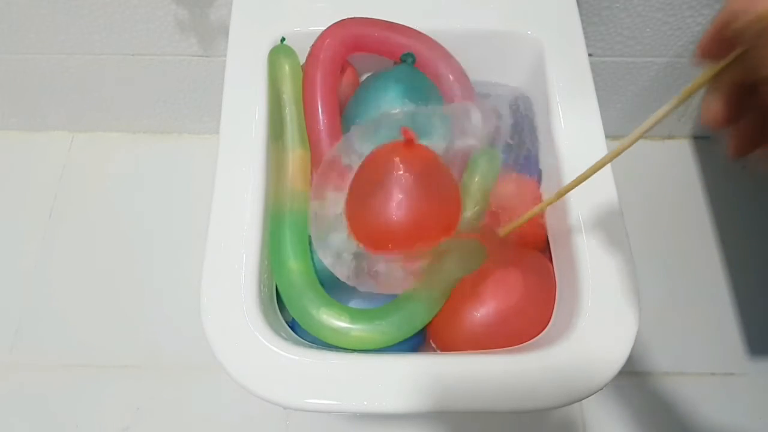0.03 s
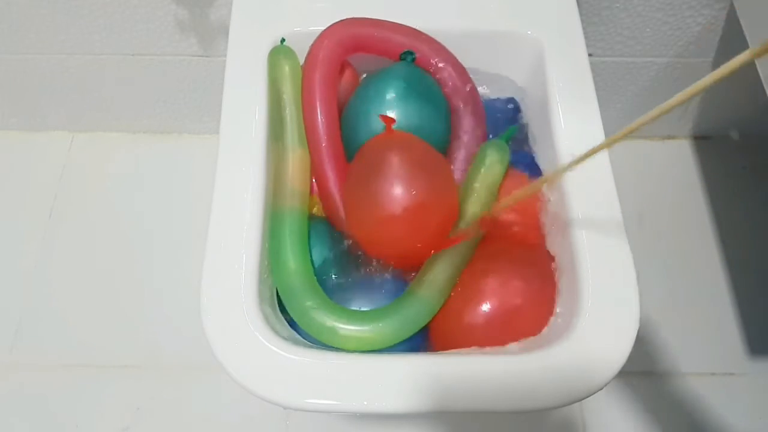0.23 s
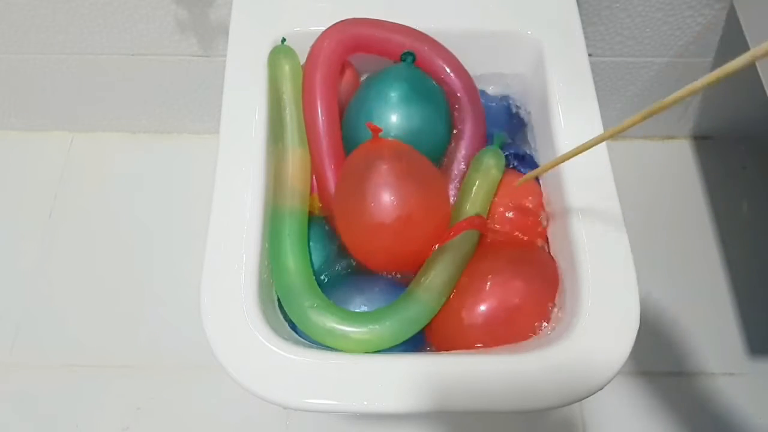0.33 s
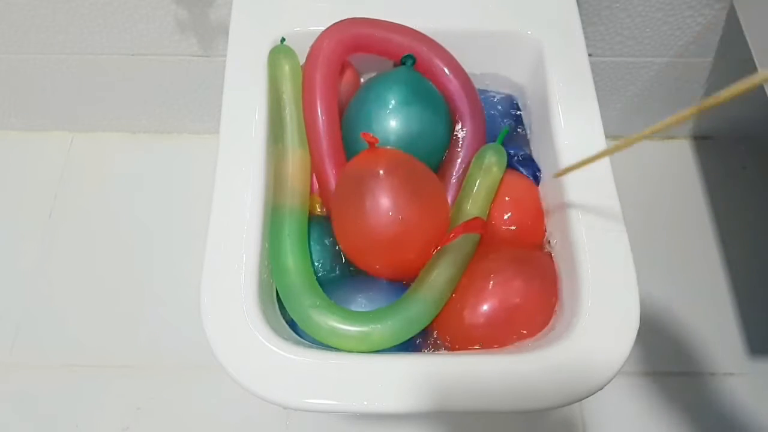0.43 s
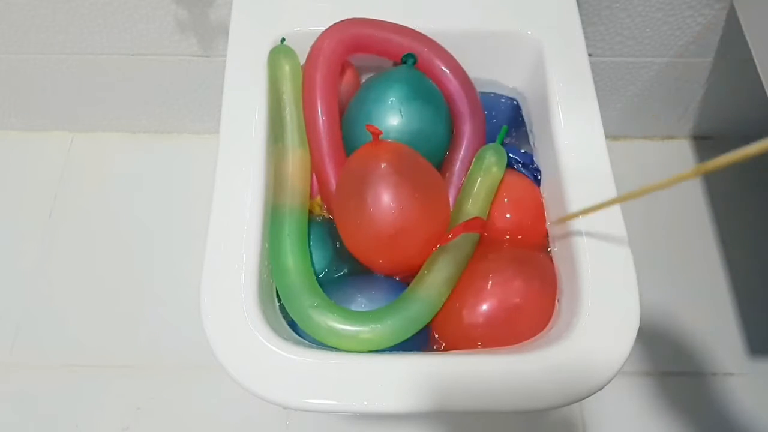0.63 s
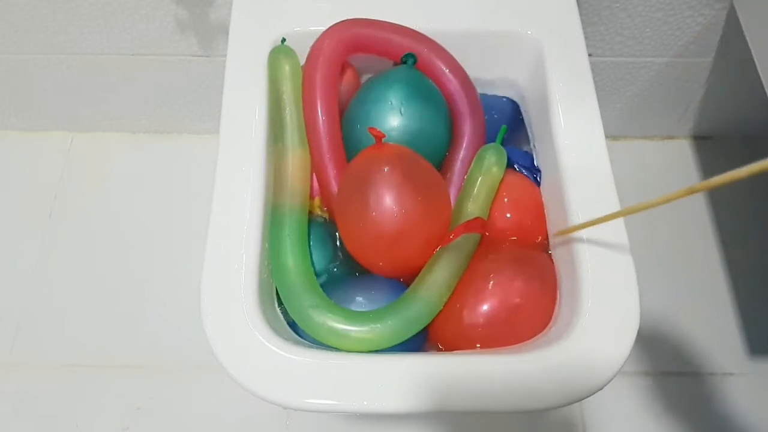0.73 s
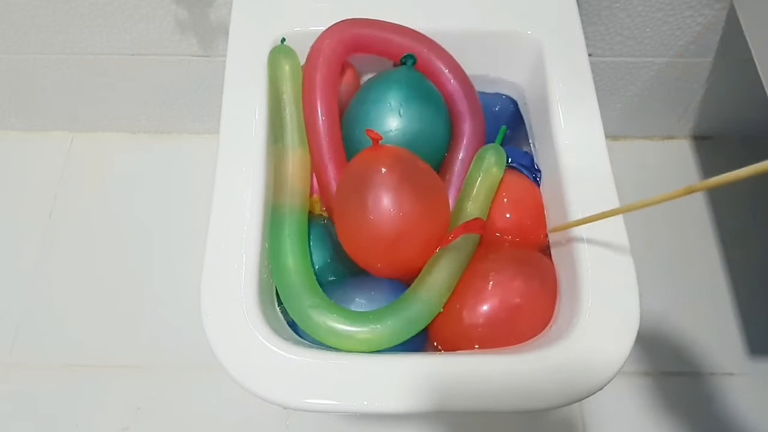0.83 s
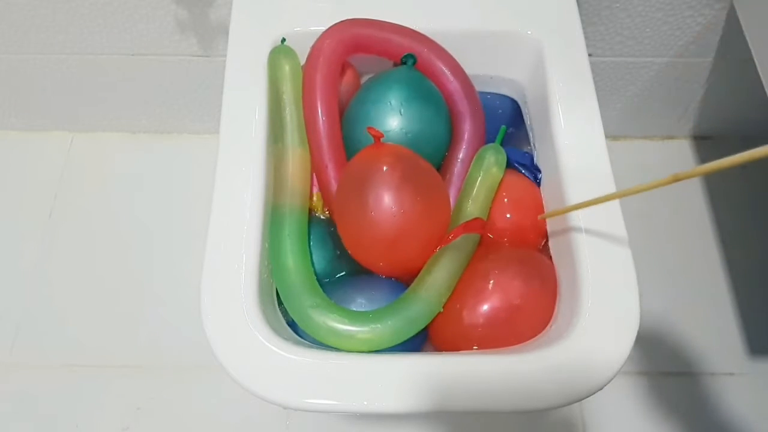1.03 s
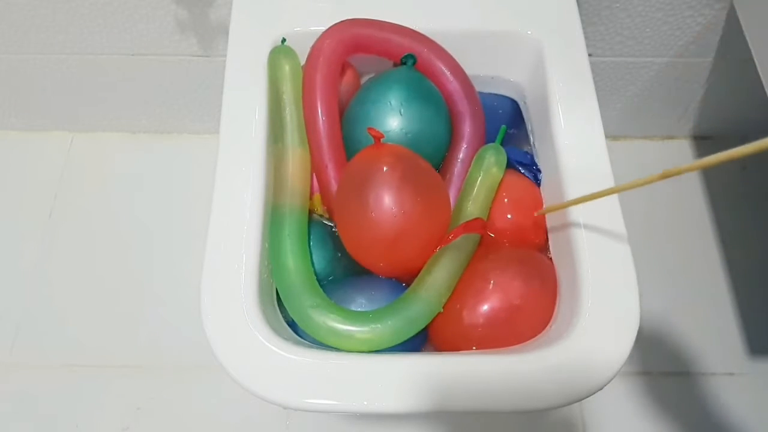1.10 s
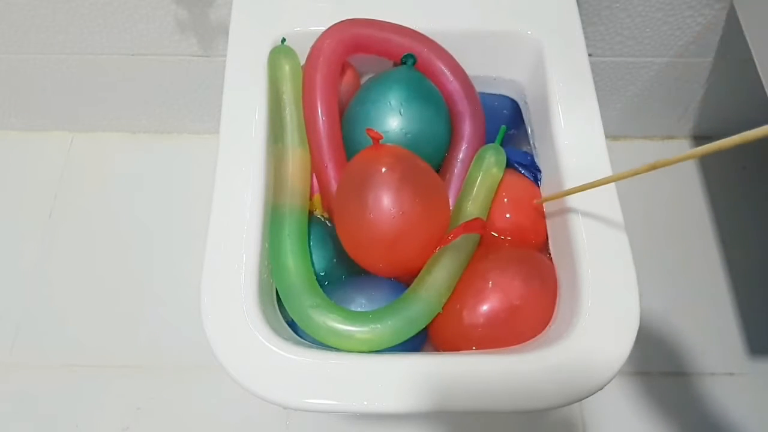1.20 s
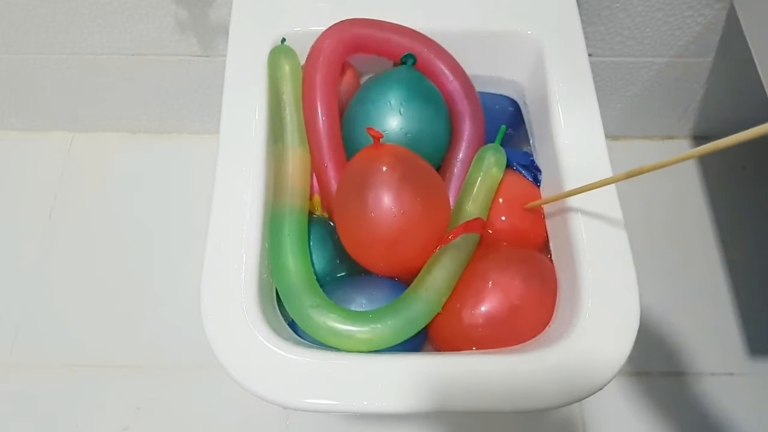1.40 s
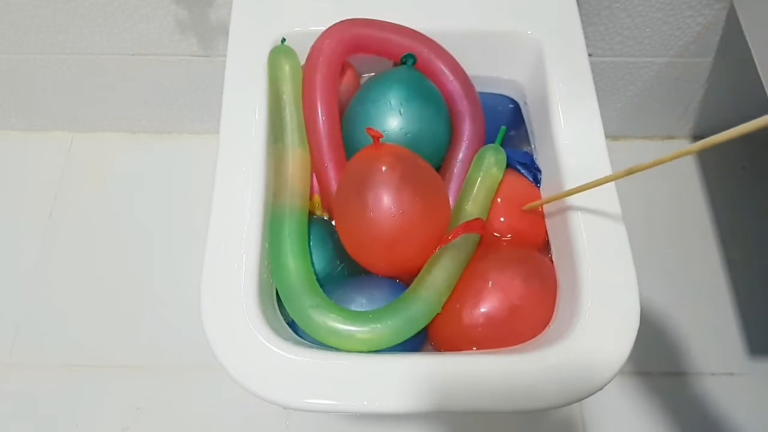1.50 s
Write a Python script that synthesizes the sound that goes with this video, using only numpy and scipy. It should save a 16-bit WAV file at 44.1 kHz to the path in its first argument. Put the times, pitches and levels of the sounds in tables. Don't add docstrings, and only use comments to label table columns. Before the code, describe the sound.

A balloon bursts: after 0.2 seconds of quiet room tone, a tiny rubber tear leads instantly into a very loud, sharp crack. Dense echoes from basin and tiled walls ring brightly, fading over about half a second. Faint water trickles and small drips follow from 0.45 to 1.0. From 1.2 to 1.55 a soft low dragging rumble with slight ticks, then quiet hiss. Close stereo phone microphone.

```python
import sys
import numpy as np
from scipy import signal
from scipy.io import wavfile

SR = 44100
rng = np.random.default_rng(int(sys.argv[2]) if len(sys.argv) > 2 else 0)


def store_pcm(level_fs):
    pcm = np.round(np.clip(level_fs, -1, 1) * 32767).astype(np.int16)
    wavfile.write(sys.argv[1], SR, np.atleast_2d(pcm).T)


def makeup_ratio(level_db):
    decades = np.asarray(level_db, float) / 20
    return 10 ** decades


N = 68355
T = np.arange(N) / SR
RUN_IN = 8000
BAND_EDGES_HZ = 22 * 2 ** np.arange(0, 9.5, .35)

# (time [s], peak level [dB], pitch [Hz], left-right [dB])
SNAPS = [
    (.1997, -13, 2400, -1.5),
    (.2008, -12, 2400, -5.0),
    (.20214, -.1, 2750, -1.5),
    (.2033, -8.5, 2100, 0),
    (.2046, -8, 1750, -1.5),
    (.2086, -12, 2100, 3.0),
    (.2091, -10, 1900, 0),
]
# (frequency [Hz], density [dB per Hz])
BANG_COLOUR = [(150, -23), (260, -22), (360, -6), (800, -0.5), (1250, -2), (2300, 3), (6500, -7),
               (15000, -8.5)]
# (time [s], peak level [dB], pitch [Hz], left-right [dB])
ECHOES = [(0.2086, -13, 1894, -1), (0.211, -13, 3100, -15), (0.2135, -15, 2411, -14),
          (0.2153, -20, 861, -5), (0.22, -14, 1033, 2), (0.2195, -13, 3273, 3), (0.225, -15, 3014, -1),
          (0.2289, -18, 1550, -7), (0.2374, -20, 3100, 1), (0.237, -12, 2067, 9), (0.2413, -13, 1894, -6),
          (0.2471, -17, 2497, 5), (0.249, -12, 3703, -3), (0.253, -15, 2583, 3), (0.2578, -21.5, 2153, -21),
          (0.2612, -26, 2756, 5), (0.2672, -23, 2497, -1), (0.2783, -22, 3186, -15), (0.279, -19, 775, -5),
          (0.2833, -22, 1033, -12), (0.2848, -23, 3014, 4), (0.289, -22, 1119, -14), (0.291, -22, 2239, 3),
          (0.2977, -18, 2497, 14), (0.3043, -20, 2670, 1), (0.308, -22, 2411, -11), (0.3145, -20, 1119, 2),
          (0.3153, -18, 3014, -8), (0.3213, -18, 1119, -9), (0.328, -24, 1291, 13), (0.3302, -34, 2153, -4),
          (0.3412, -24, 1291, -1)]
# (frequency [Hz], T60 [s])
TILES_T60 = [(100, 1.0), (300, 0.92), (700, 0.79), (2000, 0.74), (4000, 0.62), (8000, 0.5), (12500, .42),
             (14300, 0.36)]
# (frequency [Hz], delay [s])
FIRST_WALL = [(600, 0.00401), (2500, 0.0058), (7000, .013), (14000, .012)]
# (frequency [Hz], level [dB], T60 [s])
ROOM_MODES = [(330.3, -7, 0.82), (390.6, -6.5, .8), (521.6, -1, .8), (775, -7.5, .5), (810, -2.5, .5),
              (968, -1.5, 0.58), (1128, -1, 0.68), (1572, -1.5, 0.37), (1660, -9, .5), (1964, 2, 1),
              (2440, -2, 0.7), (2720, -3, 0.67), (3300, 3.5, 0.55)]
# (middle time [s], peak level [dB], pitch [Hz], length
# [s])
JOLTS = [(0.21, -42.5, 181, 0.028), (0.2, -51, 38, .03), (0.22, -24.5, 797, 0.017), (0.29, -33, 960, 0.087),
         (.3, -37.5, 1100, 0.04), (0.25, -42, 385, 0.06), (0.3, -48.5, 172.5, 0.052),
         (1.211, -45, 158, 0.066), (1.193, -57.5, 650, 0.07), (1.232, -48.5, 250, 0.021),
         (.34, -65, 33, 0.062), (.262, -30.5, 2390, .06), (.315, -39, 400, .05), (.24, -30.5, 960, 0.06),
         (.305, -30, 3370, 0.037), (.385, -65.5, 95, 0.088), (.445, -59, 87, 0.026), (1.28, -49, 373, .02),
         (1.276, -55.5, 640, 0.028), (1.302, -48, 344, 0.016), (1.317, -54, 580, 0.021),
         (1.355, -50, 310, .02), (1.6, -41.5, 265, 0.012), (1.3966, -53.5, 650, 0.015),
         (1.414, -47, 390, .018), (1.471, -53.5, 340, 0.024), (1.492, -53, 317, 0.019),
         (1.511, -51.5, 500, 0.017), (1.269, -44.5, 145, 0.04), (1.281, -50, 410, 0.076),
         (1.321, -44, 162, 0.035), (1.9, -49, 55, 0.055), (1.355, -55.5, 391.7, 0.05),
         (1.395, -49, 173, 0.062), (1.403, -48.5, 390, 0.027), (1.418, -52, 480, 0.046),
         (1.464, -50.5, 165.2, 0.038), (1.511, -51.5, 173, 0.042), (1.54, -59.5, 55, 0.048)]
# (time [s], peak level [dB], pitch [Hz], ring [cycles])
DROPS = [(0.6634, -45.5, 920, 7.8), (0.753, -45.5, 2600, 8.0), (0.7824, -51.5, 5640, 5.6),
         (.7826, -52, 11000, 3.0), (.782, -51, 1821, 6.4), (.7815, -49.5, 3020, 6.7),
         (.9115, -48, 3550, 22), (0.9126, -47, 1429, 5.2), (0.9128, -44.5, 2400, 10.9),
         (.9125, -52, 6500, 5.0), (.9155, -49, 2165, 7.46), (.9245, -53, 2220, 8.6), (.928, -53, 3610, 33),
         (.945, -59, 3800, 27), (.9378, -57, 2870, 12), (.9595, -55, 2200, 9.5), (.9965, -56, 2200, 9.4),
         (1.0417, -62, 6990, 25), (1.321, -58, 2337, 12.6), (.9385, -54.5, 2010, 5),
         (0.9664, -54, 2980, 3.5), (1.226, -60, 11030, 6.4), (1.4374, -47, 14320, 38),
         (1.4375, -53.5, 12160, 30.0), (1.4378, -57, 4560, 8.2), (1.4555, -50, 1520, 31),
         (1.4757, -51.5, 1590, 11.3), (1.4762, -55, 2200, 8.7)]
# (time [s], level [dB])
TRICKLE = [(.2, -76), (.45, -52.5), (.65, -59), (.8, -60), (.9, -62.5), (.93, -56.5), (1.02, -66.5),
           (1.2, -71.5), (1.55, -67.5)]
# (frequency [Hz], density [dB per Hz])
WATER_COLOUR = [(300, -21), (600, -10), (1000, -2.5), (2600, -3.5), (4500, -13.5), (8000, -16),
                (13000, -22.5), (15000, -23)]
# (time [s], level [dB])
DRAG = [(1.175, -68), (1.205, -49), (1.246, -47.5), (1.268, -46), (1.374, -46), (1.402, -46),
        (1.434, -48.5), (1.502, -49.5), (1.55, -57.5)]
# (frequency [Hz], density [dB per Hz])
DRAG_COLOUR = [(25, -3), (55, -5.5), (90, -7.5), (160, -5.5), (300, -6), (600, -10.5), (900, -18),
               (1500, -21.5), (4000, -44)]
# (frequency [Hz], density [dB per Hz])
AIR_COLOUR = [(30, -17), (50, -2.5), (95, -15.5), (160, -2.5), (350, -1.5), (650, -5.5), (1100, -12),
              (4000, -23)]
# (frequency [Hz], likeness [-1 to 1])
LIKENESS = [(30, 1.3), (130, 0.6), (290, 1.17), (640, 0.43), (1400, 0.01), (15000, 0)]
# (frequency [Hz], left-right [dB])
SIDES = [(60, -1), (240, -5), (950, -6.5), (3770, -4.5), (15000, 3)]
# (frequency [Hz], left-right [dB])
TILES_SIDES = [(60, -14), (240, -8), (950, -2), (3770, -3), (15000, 2.2)]

TEAR_START_S, TEAR_RISE_S, TEAR_END_S, TEAR_DB = .1977, 0.0016, .2048, -21
SNAP_LOW_CUT_HZ, SNAP_T60_S = 259, .0012
BURST_S = SNAPS[0][0]
AFTER_BANG_S = SNAPS[1][0]
ECHO_DB, ECHO_S = -5.5, 0.00089
TILES_DB, TILES_BUILD_S, LOW_DELAY_CYCLES = -22, 0.004, 3.0
TILES_PATCHY_DB, TILES_TOP_HZ = 1.5, 14100
BEFORE_WALL = 0.47
TAIL_LIFT_DB, LIFT_FADES_S, LIFT_FADE_S = 2.5, .14, 0.016
MODES_DB, MODE_BUILD_CYCLES, LONGEST_MODE_S = -31.5, 35, .55
DROP_ROOM_DB, DROP_ROOM_CUT_HZ, DROP_ROOM_EXTRA_DB_PER_S = -39, 8600, 65.5
NEAR_FROM_S = 1.1
FIZZ_PER_S = 5100
AIR_DB, AIR_DUCK_DB, AIR_BACK_S = -61.5, -10, 0.33
HISS_DB, HISS_TILT, HISS_RISE_DB, HISS_LOW_HZ, HISS_TOP_HZ = -78, 0.22, 5, 2500, 14600
CUTOFF_HZ = 15600
MIC_DIP_HZ, MIC_DIP_Q, MIC_DIP_SHARE = 9110, 10, .45


def rms_one(x):
    return x / np.sqrt(np.mean(x ** 2) + 1e-20)


def in_time(rows):
    return np.interp(T, *np.transpose(rows))


def at_hz(points, hz):
    table_hz, values = np.transpose(points)
    return np.interp(np.log(hz), np.log(table_hz), values)


def filtered(sos, x):
    return signal.sosfilt(sos, x)


def left_right(db):
    return makeup_ratio(np.array([[db / 2], [-db / 2]]))


def drift(rate_hz):
    r = np.exp(-2 * np.pi * rate_hz * 40 / SR)
    slow = signal.lfilter([1], [1, -2 * r, r * r], rng.standard_normal(N // 40 + 2002))[2000:]
    return np.interp(np.arange(N) / 40, np.arange(len(slow)), rms_one(slow))


def ring(clicks, hz, t60):
    r, w = makeup_ratio(-60 / (t60 * SR)), 2 * np.pi * hz / SR
    return signal.lfilter([0, np.sin(w)], [1, -2 * r * np.cos(w), r * r], clicks + 1e-18)


def noise():
    return rng.standard_normal((2, 2, N + RUN_IN))


def bands(white, spectrum, sides, shape):
    out = 0
    for k, (low, high) in enumerate(zip(BAND_EDGES_HZ, BAND_EDGES_HZ[1:])):
        band = signal.butter(2, [low, high], "band", fs=SR, output="sos")
        mid, side = filtered(band, white[k % 2])[:, RUN_IN:]
        hz = np.sqrt(low * high)
        alike = np.clip(at_hz(LIKENESS, hz), -1, 1)
        pair = np.sqrt(1 + alike) * mid + np.sqrt(1 - alike) * side * [[1], [-1]]
        out = out + makeup_ratio(at_hz(spectrum, hz)) * shape(hz) * pair * left_right(at_hz(sides, hz))
    return out


def burst():
    rise = np.clip((T - TEAR_START_S) / TEAR_RISE_S, 0, 1) ** 3
    end = np.exp(-np.clip(T - TEAR_END_S, 0, 1) / 0.00097)
    out = makeup_ratio(TEAR_DB) * rise * end * rms_one(bands(noise(), BANG_COLOUR, TILES_SIDES, lambda hz: 1))
    for s, db, hz, pan_db in SNAPS:
        cycles = (T - s) * hz
        onset = (cycles / 0.2) ** 2
        decay = cycles / (hz * SNAP_T60_S) * np.log(1000)
        fade = np.exp(-np.where(cycles < 0, onset, decay))
        out -= makeup_ratio(db) * left_right(pan_db) * np.cos(2 * np.pi * cycles) * fade
    return filtered(signal.butter(5, SNAP_LOW_CUT_HZ, "high", fs=SR, output="sos"), out)


def echoes():
    out = np.zeros((2, N))
    for s, db, hz, pan_db in ECHOES[1:]:
        pan_db = np.clip(pan_db, -12, 12)
        level = makeup_ratio(db + ECHO_DB - abs(pan_db) / 4) * left_right(pan_db)
        tone = np.sin(2 * np.pi * (hz * T + rng.random((2, 1))))
        out += level * tone * np.exp(-((T - s) / ECHO_S) ** 2)
    return out


def tiles():
    def dying(hz):
        arrived = (1 + np.tanh((T - at_hz(FIRST_WALL, hz)) / 0.00102)) / 2
        wall = BEFORE_WALL + (1 - BEFORE_WALL) * arrived
        build = 1 - np.exp(-T / (TILES_BUILD_S + LOW_DELAY_CYCLES / hz))
        return wall * build * makeup_ratio(TILES_PATCHY_DB * drift(45) - 60 * T / at_hz(TILES_T60, hz))

    tail = bands(noise(), [(80, -62)] + BANG_COLOUR, TILES_SIDES, dying)
    tail = filtered(signal.ellip(6, 1, 30, TILES_TOP_HZ, fs=SR, output="sos"), tail)
    return tail / np.sqrt(np.mean(tail[:, :SR // 20] ** 2))


def bang_tail(room):
    lift = TAIL_LIFT_DB / (1 + np.exp((T - LIFT_FADES_S) / LIFT_FADE_S))
    start = int(BURST_S * SR)
    return np.pad(makeup_ratio(TILES_DB + lift) * room, ((0, 0), (start, 0)))[:, :N]


def modes():
    since = np.clip(T - SNAPS[2][0], 0, 9)
    out = np.zeros((2, N))
    for hz, db, t60 in ROOM_MODES:
        decay = makeup_ratio(MODES_DB + db - 60 * since / min(t60, LONGEST_MODE_S + 100 / hz))
        build = 1 - np.exp(-since * hz / MODE_BUILD_CYCLES)
        phase = rng.random((2, 1)) * np.clip(hz / 1500, 0, 1)
        out += decay * build * np.sin(2 * np.pi * (hz * since + phase))
    return out


def jolts():
    dry = np.zeros(N)
    for s, db, hz, length in JOLTS:
        swell = np.exp(-(3.5 * (T - s) / length) ** 2)
        dry += makeup_ratio(db) * np.sin(2 * np.pi * (hz * T + rng.random())) * swell
    return dry * left_right(-4.4)


def drops(room):
    dry = np.zeros(N)
    for s, db, hz, cycles in DROPS:
        start, size = int(s * SR), int(SR * (0.00045 + 1.58 / hz))
        rough = 1 + .5 * rng.standard_normal(size)
        puff = np.zeros(N)
        puff[start:start + size] = rough * np.hanning(size) * np.cos(2 * np.pi * hz * T[:size])
        one = ring(puff, hz, cycles / hz)
        dry += makeup_ratio(db) * one / np.abs(one).max()
    short_room = room * makeup_ratio(-DROP_ROOM_EXTRA_DB_PER_S * T)
    dull = filtered(signal.butter(1, DROP_ROOM_CUT_HZ, fs=SR, output="sos"), short_room)
    in_basin = dry * (T < NEAR_FROM_S)
    wet = signal.fftconvolve(in_basin[None], dull)[:, :N]
    return dry * left_right(-3) + makeup_ratio(DROP_ROOM_DB) * wet


def trickle():
    hits = rng.random(N + RUN_IN) < FIZZ_PER_S / SR
    sizes = makeup_ratio(2.3 * np.minimum(rng.exponential(1, N + RUN_IN), 3.2))
    grains = noise() * (.5 + hits * sizes)
    water = rms_one(bands(grains, [(120, -47.0)] + WATER_COLOUR, TILES_SIDES, lambda hz: 1))
    return makeup_ratio(in_time(TRICKLE) + 1.3 * drift(6.9)) * water * (T > BURST_S)


def drag():
    lumps = makeup_ratio(1.4 * drift(40))
    body = rms_one(bands(noise(), DRAG_COLOUR + [(9000, -70)], SIDES, lambda hz: lumps))
    before = (DRAG[0][0] - .03, -90)
    return makeup_ratio(in_time([before] + DRAG) - 4.0) * body


def room_tone():
    duck = AIR_DUCK_DB * (T > AFTER_BANG_S) / (1 + np.exp((T - AIR_BACK_S) / .015))
    air = bands(noise(), AIR_COLOUR + [(12000, -41.5)], SIDES, lambda hz: makeup_ratio(1.2 * drift(12)))
    return makeup_ratio(AIR_DB + duck) * rms_one(air)


def hiss():
    white = signal.lfilter([1, -HISS_TILT], [1], rng.standard_normal((2, N)))
    low_cut = signal.butter(1, HISS_LOW_HZ, "high", fs=SR, output="sos")
    top_cut = signal.ellip(8, .5, 50, HISS_TOP_HZ, fs=SR, output="sos")
    level = makeup_ratio(HISS_DB + HISS_RISE_DB * (T > AFTER_BANG_S))
    return level * rms_one(filtered(top_cut, filtered(low_cut, white)))


def scene():
    room = tiles()
    bang = burst() + echoes() + bang_tail(room) + modes()
    water = drops(room) + trickle()
    return bang + jolts() + water + drag() + room_tone() + hiss()


def band_limit(x):
    return signal.sosfilt(signal.butter(12, 15600, fs=SR, output="sos"), x)


def record(dry):
    cut = filtered(signal.cheby2(10, 50, CUTOFF_HZ, fs=SR, output="sos"), dry)
    peak = signal.lfilter(*signal.iirpeak(MIC_DIP_HZ, MIC_DIP_Q, SR), cut)
    return band_limit(cut - MIC_DIP_SHARE * peak)


dry = scene()
out = record(dry)
store_pcm(out)
```